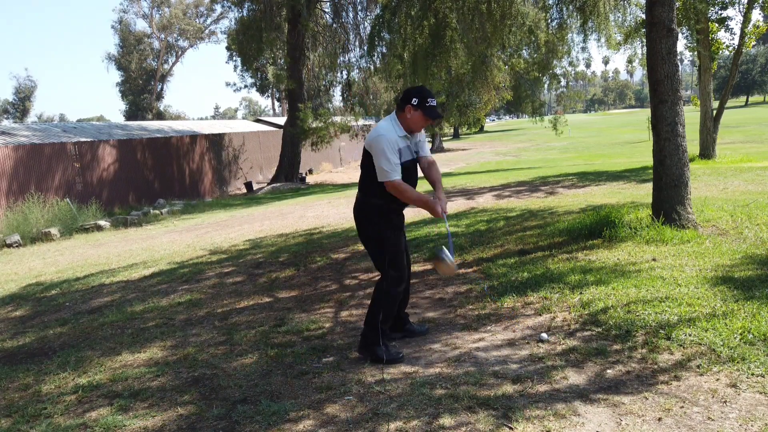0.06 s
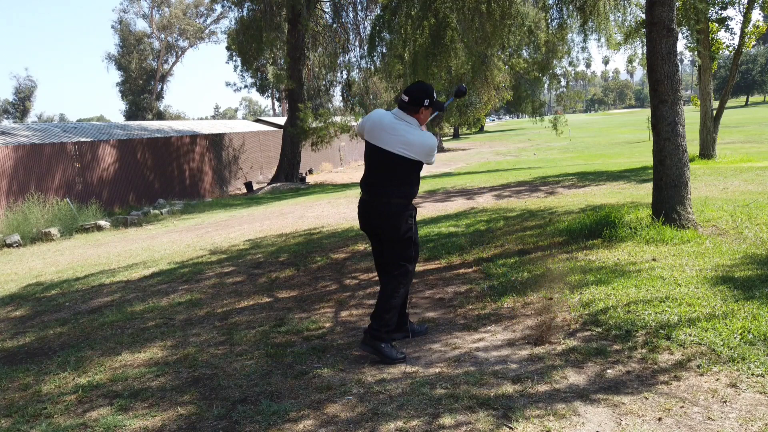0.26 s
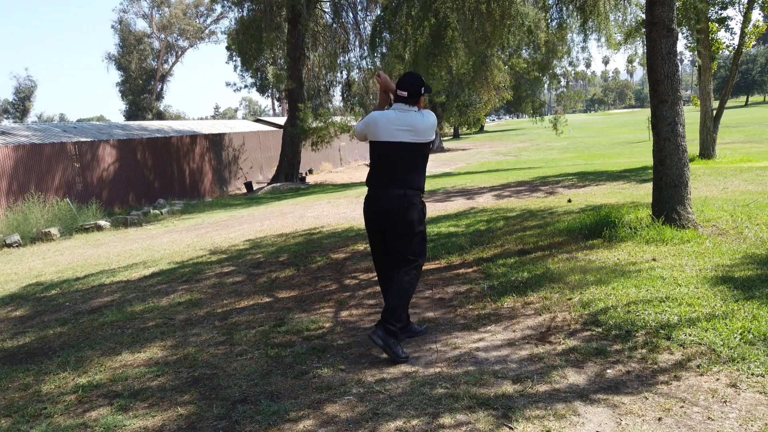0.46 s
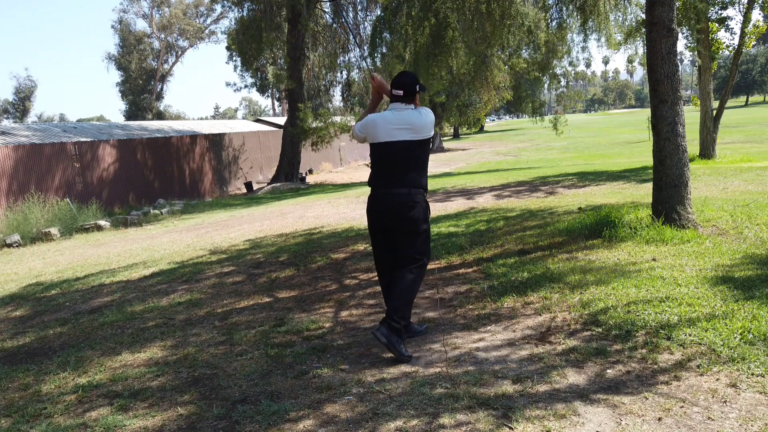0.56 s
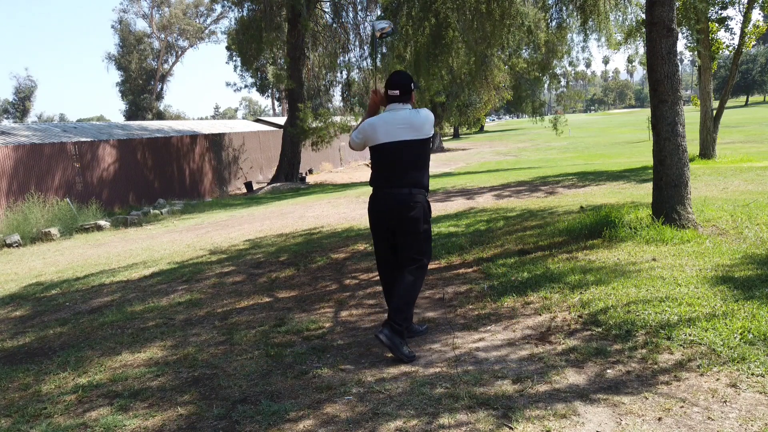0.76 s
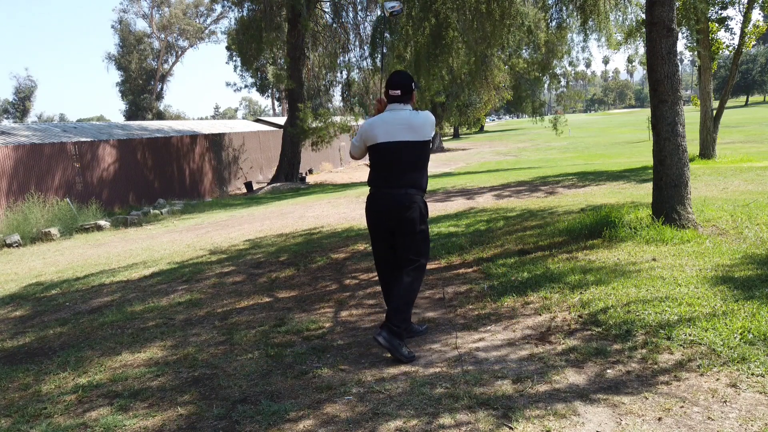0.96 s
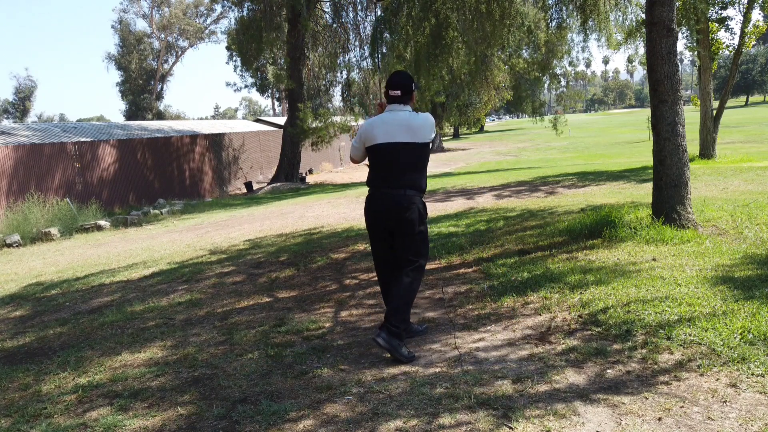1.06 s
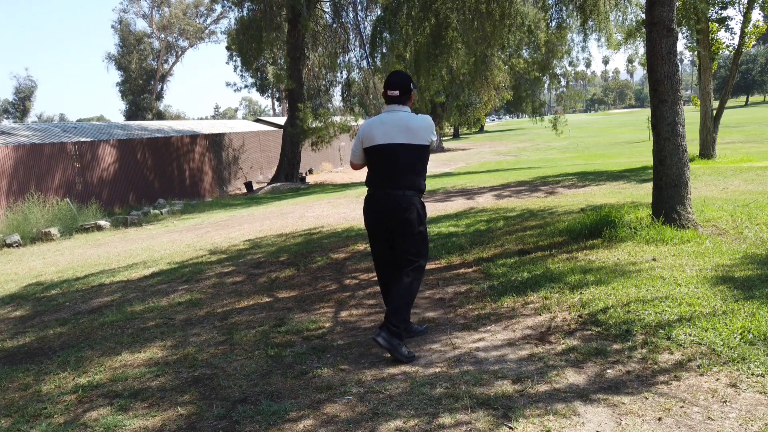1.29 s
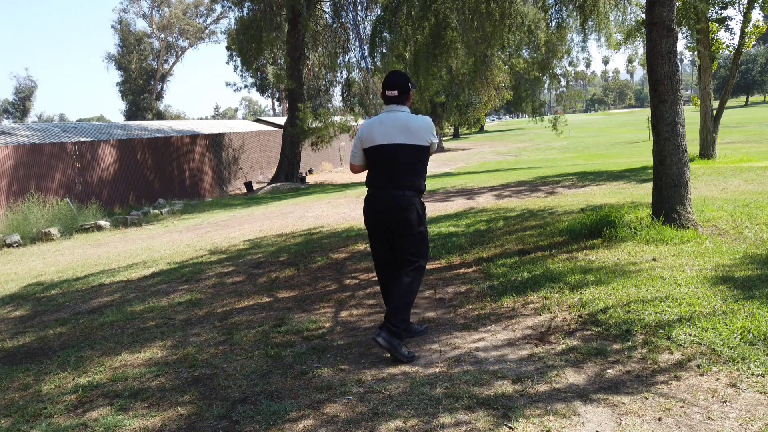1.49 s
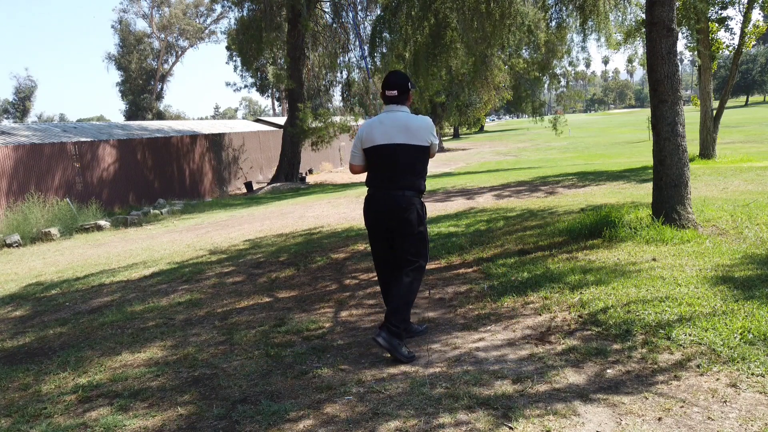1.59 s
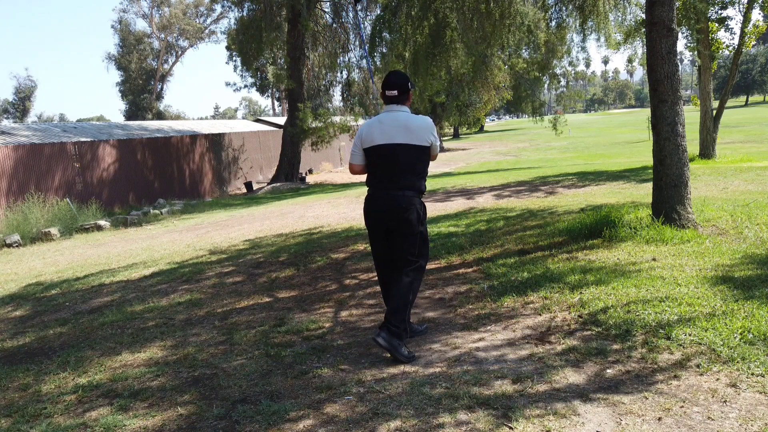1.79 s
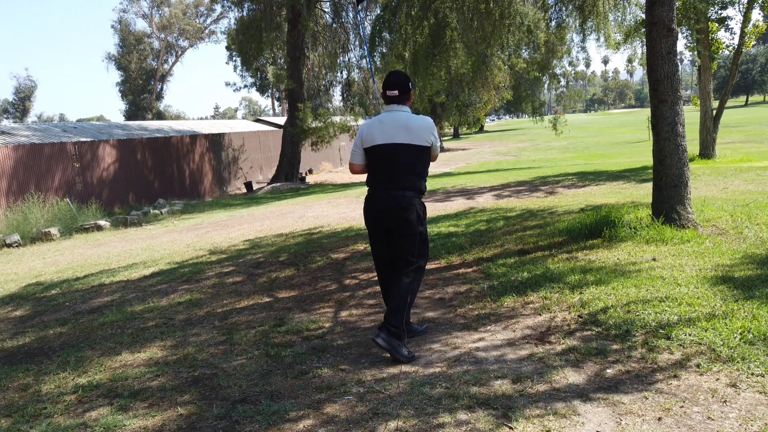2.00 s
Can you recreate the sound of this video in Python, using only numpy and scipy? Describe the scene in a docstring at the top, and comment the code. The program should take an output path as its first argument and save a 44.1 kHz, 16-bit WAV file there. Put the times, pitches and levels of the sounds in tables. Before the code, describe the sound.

A metal golf club swishes down, scuffs dry turf and hits the ball with a loud, bright crack and brief hollow ring; dirt sprays, trees return a fading echo, and wind rumbles on the close microphone.

```python
"""Golf drive under trees

Out in the open, close to the ball: a metal wood swishes down, scuffs dry turf and cracks off the ball.
Decaying sines make the crack and the ring of the hollow head, whose pitch sinks as it swings away.
Coloured clicks make the dirt that sprays and patters down; blurred noise bands return from the trees.
Wind rumbles on the microphone over a distant wash; small taps and faint far whistles come and go."""
import sys
import numpy as np
from scipy import signal
from scipy.fft import rfft, irfft
from scipy.io import wavfile
from scipy.ndimage import uniform_filter1d

SR = 44100
rng = np.random.default_rng(int(sys.argv[2]) if len(sys.argv) > 2 else 0)


def output_pcm(signal):
    """Save a mono or channel-first signal as 16-bit PCM at the path in sys.argv[1].

    Samples are clipped to [-1, 1] before scaling.
    """
    pcm = np.clip(np.atleast_2d(signal).T, -1, 1) * 32767
    wavfile.write(sys.argv[1], SR, np.round(pcm).astype(np.int16))


N = 90404
T = np.arange(N) / SR  # seconds
HIT_S = .33625  # club meets ball

# Wind gusts on the microphone. Each row: time in seconds, level in dB.
GUSTS = [(0, -31.5), (.12, -33.5), (.21, -21), (.26, -4), (.34, -22.5), (.42, -9.5), (.49, -26),
         (.56, -16.5), (.68, -32), (.82, -46), (1.15, -44), (1.45, -43), (1.55, -31), (1.68, -33),
         (1.79, -32), (1.88, -42), (2.05, -37)]
# Spectrum of the wind buffeting. Each row: frequency in Hz, relative level in dB.
BUFFET_COLOUR = [(5, -11.5), (11, -1.5), (19, -0.5), (25, -2.5), (32, -20.5), (45, -34.5), (70, -53.5),
                 (200, -105)]
# Spectrum of the flutter above the buffeting. Each row: frequency in Hz, relative level in dB.
FLUTTER_SPECTRUM = [(20, 0), (40, -0.5), (62, 0), (85, -8), (120, -13.5), (170, -21.5), (400, -32.5),
                    (2000, -71.5)]
FLUTTER_DB, FLUTTER_SHARE = -32, 0.39  # share: dB of flutter per dB of gust
# Distant wash. Each row: time in seconds, level in dB.
WASH_LEVEL = [(0, -41), (.26, -36), (.45, -48), (.58, -55), (.8, -52), (1.3, -52), (1.6, -48.5),
              (1.8, -48.5), (2.05, -49)]
# Spectrum of the wash. Each row: frequency in Hz, relative level in dB.
WASH_SPECTRUM = [(20, 3.5), (45, 13), (65, 18), (85, 10), (120, 11), (170, -0.5), (330, -7.5), (600, -5),
                 (830, -1.5), (1300, -9.5), (2000, -19), (3500, -31), (8000, -37.5), (15000, -38)]
# Spectrum of the steady rustle of leaves. Each row: frequency in Hz, relative level in dB.
RUSTLE_COLOUR = [(300, -5.5), (1000, 0), (2000, -3), (2700, -3.5), (3400, -15), (6000, -19.5), (15000, -21)]
RUSTLE_DB = -71

# Swish of the shaft. Each row: time in seconds, level in dB.
SHAFT_LEVEL = [(0, -59.5), (.055, -62), (.10, -54), (.13, -52.5), (.165, -44.5), (.215, -51), (.258, -39),
               (.305, -35), (.33, -56.5), (.36, -87)]
# Spectrum of the swish. Each row: frequency in Hz, relative level in dB.
SHAFT_SPECTRUM = [(200, -24.5), (1200, -3), (2800, 3.5), (5000, 1), (9000, 0), (15000, -5)]
# Spectrum of the low whoosh of the head. Each row: frequency in Hz, relative level in dB.
WHOOSH_SPECTRUM = [(150, -15), (330, -5), (450, -5), (590, 2), (720, -3), (880, -6.5), (1200, -18.5),
                   (3000, -37)]
WHOOSH_S, WHOOSH_WIDTH_S, WHOOSH_DB = 0.3073, 0.018, -30.5

# Small taps, low thumps and ticks; the pair near 1.09 s may be a distant echo of the crack
# or the ball striking something.
# Each row: start in seconds, peak in dB, centre in Hz, width in octaves, t60 in seconds.
SMALL_TAPS = [(0.151, -48, 398, 1.8, 0.052), (0.255, -26, 2770, 1.2, 0.029),
              (0.613, -43.5, 306, 1.4, 0.031), (0.8128, -42, 407, 1.2, 0.018), (0.807, -58, 7560, .8, 0.15),
              (1.0918, -48.5, 5180, .18, 0.013), (1.0926, -49, 7000, .9, .01),
              (1.597, -57, 3400, 0.3, 0.032), (1.606, -58, 4070, 0.39, 0.034),
              (1.662, -63.5, 3310, .18, 0.023)]

# Spectrum of the sole scuffing the turf. Each row: frequency in Hz, relative level in dB.
SCUFF_SPECTRUM = [(200, -9), (900, 3), (1500, 4.5), (2100, -5), (3000, 2), (5500, -3.5), (8000, -14),
                  (15000, -17)]
SCUFF_LEAD_S, SCUFF_WIDTH_S, SCUFF_DB = .0015, 0.00081, -2  # lead: ahead of the ball

# Modes of the hollow head, each of which may beam at the microphone as the head turns.
# Each row: frequency in Hz, relative level in dB, t60 in seconds, beam moment in seconds, beam gain in dB.
HEAD_MODES = [(3615, -4, 0.025, .35, 1), (3900, -7, 0.09, .386, 13.5), (4157, 1, 0.024, 0.34, 5),
              (4330, -17.5, 0.076, 0.46, 3), (4620, -18, 0.055, 0.39, 4.5), (5120, -10.5, .03, .35, -0.5),
              (5730, -1.5, 0.016, .35, 1), (5890, 1, 0.062, .374, 5.5), (6510, -12.5, 0.085, .353, 4),
              (6700, -4, .042, .385, 7.5), (7860, -5, 0.038, .361, 9), (8560, -2, 0.055, 0.41, 3),
              (9260, -1, 0.035, .37, 3), (10430, -13.5, 0.062, .36, 2), (11160, -18.5, 0.054, .363, 9.5),
              (13500, -7, .012, .35, 0.5)]
# Doppler shift as the head swings away. Each row: time in seconds, shift in percent.
DOPPLER = [(.336, .2), (.348, -.4), (.361, -1.1), (.376, -3.6), (.40, -3.9)]
# Reflections of the ring off the ground and two trunks.
# Each row: delay in seconds, level in dB, share of the Doppler shift, tilt in dB per octave.
REFLECTIONS = [(.016, -15, -.2, 3), (0.035, -32.5, -1.14, 6.5), (.08, -21.5, -0.12, -12)]
RING_DB, RING_LEAD_S, RING_RISE_S, BEAM_WIDTH_S = -3.5, .0008, .001, .0085
# random pitch drift in percent (rms), separate for each mode and path, and its memory
DRIFT_PERCENT, DRIFT_S = 0.16, 0.0076
SCATTER, SCATTER_S = .35, .0012  # level flutter as a share (rms), and its memory
SMEAR = .1  # the longer the path, the softer its onset (s of rise per s of delay)

# Ball and face during the blow. Each row: frequency in Hz, level in dB, t60 in seconds.
BALL_MODES = [(335, -15.5, 0.016), (1040, -10, 0.0035), (1450, 6.5, .0095), (1690, 0, 0.0085),
              (2486, -2.5, 0.0074), (2950, 1, 0.0044), (4000, 3, .004)]
# Spectrum of the noisy snap. Each row: frequency in Hz, relative level in dB.
SNAP_SPECTRUM = [(300, -13), (2200, -16), (3400, -14.5), (6000, -3.5), (9000, -2), (12000, -6.5),
                 (15000, -5)]
SNAP_DB, SNAP_T60_S = -3, 0.019

# Spectrum of the sole's thump into the ground. Each row: frequency in Hz, relative level in dB.
THUD_SPECTRUM = [(40, -7.5), (85, 3), (130, -7), (250, -19.5), (600, -30.5), (2000, -61)]
THUD_DB, THUD_T60_S = -22.5, .17
# Spectrum of the dirt spraying from the turf. Each row: frequency in Hz, relative level in dB.
SPRAY_SPECTRUM = [(90, 8.5), (200, -2.5), (500, -2.5), (900, 4.5), (1500, 3.5), (2300, -3), (3100, -12.5),
                  (7000, -7), (15000, -9.5)]
SPRAY_DB, SPRAY_RISE_S, SPRAY_T60_S, SPRAY_PER_S = -29, 0.027, 0.15, 5000
# Spectrum of grit thrown through the grass behind the club. Each row: frequency in Hz, relative level in dB.
GRIT_SPECTRUM = [(500, -8), (3000, -4.5), (6500, 1), (10000, 2.5), (15000, -3)]
GRIT_S, GRIT_WIDTH_S, GRIT_DB, GRIT_PER_S = .412, 0.021, -47.5, 3700
# Spectrum of the settling patter. Each row: frequency in Hz, relative level in dB.
PATTER_SPECTRUM = [(500, -21.5), (3000, -8.5), (7000, 6.5), (10000, 1), (15000, -2.5)]
PATTER_DB, PATTER_T60_S, PATTER_PER_S = -66.5, 4.9, 7300

# Broad bands of the returning ring: every direction has its own Doppler shift.
# Each row: frequency in Hz, relative level in dB.
HALO_SPECTRUM = [(1800, -29), (2280, -4.5), (2600, -16.5), (3500, -17.5), (3850, -0.5), (4060, 3),
                 (4400, -5.5), (4900, -17), (5500, -15), (5950, 0), (6700, 0.5), (7400, -10), (8700, -3.5),
                 (10000, -14), (15000, -22)]
# Filtering on the far paths. Each row: frequency in Hz, gain in dB.
FAR_FILTER = [(2300, -1), (2800, 5), (3900, 3.5), (6000, -2.5), (7300, -2.5), (9000, -8), (15000, -11.5)]
HALO_RISE_S, HALO_NEAR_DB, HALO_NEAR_T60_S, HALO_FAR_DB, HALO_FAR_T60_S = 0.071, -19, .17, -39.5, 0.66
HALO_FLICKER_DB, HALO_FLICKER_S = 2.2, .008  # rms drift of the far level, and its memory
# Spectrum of the crack coming back from the trees. Each row: frequency in Hz, relative level in dB.
TAIL_COLOUR = [(150, 4.5), (500, -9), (1400, -2.5), (2200, -4), (3200, -14.5), (7000, -18.5), (14000, -28)]
TAIL_DB, TAIL_RISE_S, TAIL_T60_S = -40, 0.068, 0.77
# Spectrum of a faint late return from the far trees. Each row: frequency in Hz, relative level in dB.
LATE_COLOUR = [(900, -19), (1700, 1), (2300, -2), (2750, -2), (3300, -16), (4700, -25), (7400, -25),
               (15000, -23)]
LATE_S, LATE_WIDTH_S, LATE_DB = 0.96, 0.16, -72

# Faint thin whistles, perhaps far birds.
# Each row: centre in seconds, half length in seconds, frequency in Hz, level in dB.
FAR_WHISTLES = [(1.128, .016, 5430, -79), (1.19, .045, 7400, -81), (1.35, .04, 5680, -80)]
WHISTLE_BLUR_S = .001

# Microphone response. Each row: frequency in Hz, gain in dB.
MIC_RESPONSE = [(100, -1), (2000, 0), (3000, -2), (9000, -1.5), (15000, -1.5)]
OVERLOAD_UP, OVERLOAD_DOWN = 1.35, 4.0  # clipping amplitudes, positive and negative
CEILING_DB, LOOKAHEAD_S, HOLD_S, RELEASE_S = 0.4, 0.0062, 0.011, 0.016
EDGE_HZ = 15550


def amp(db):
    """Decibels to gain."""
    return 10 ** (np.asarray(db) / 20)


def unit(x):
    """Scales to rms 1."""
    return x / np.sqrt(np.mean(x ** 2) + 1e-20)


def curve(points):
    """A control curve at every sample."""
    return np.interp(T, *np.transpose(points))


def read(points, hz):
    """A spectrum at the given frequencies, joined along log frequency."""
    f, value = np.transpose(points)
    return np.interp(np.log(hz + 1), np.log(f), value)


def colour(x, points):
    """Filters by a spectrum, padded to twice the length."""
    gain = amp(read(points, np.fft.rfftfreq(2 * N, 1 / SR)))
    return irfft(rfft(x, 2 * N) * gain)[:N]


def noise(points):
    """Coloured noise of rms 1."""
    return unit(colour(rng.standard_normal(N), points))


def grains(per_s, points):
    """Random coloured clicks of uneven size, rms 1."""
    clicks = rng.standard_normal(N) * (rng.random(N) < per_s / SR)
    return unit(colour(clicks, points))


def dying(start, rise, t60):
    """Straight rise times an exponential fall."""
    age = np.maximum(T - start, 0)
    return np.minimum(age / rise, 1) * np.exp(-np.log(1000) * age / t60)


def swell(centre, width):
    """A bell-shaped rise and fall."""
    return np.exp(-.5 * ((T - centre) / width) ** 2)


def wander(seconds):
    """Random drift of rms 1 with the given memory."""
    return unit(signal.lfilter([1], [1, -np.exp(-1 / (seconds * SR))], rng.standard_normal(N)))


def wind():
    """Gusts buffet the microphone; the flutter above grows only by a share of each gust."""
    gust_db = curve(GUSTS)
    buffet = noise(BUFFET_COLOUR)
    # level out the noise's own swells so the gust curve sets the loudness
    power = abs(signal.hilbert(buffet)) ** 2 / 2
    buffet = buffet / np.sqrt(uniform_filter1d(power, size=5000) + 1e-6)
    flutter = amp(FLUTTER_DB + FLUTTER_SHARE * gust_db) * noise(FLUTTER_SPECTRUM)
    return amp(gust_db) * buffet + flutter


def surroundings():
    """A distant wash follows its level curve; leaves rustle steadily."""
    wash = amp(curve(WASH_LEVEL)) * noise(WASH_SPECTRUM)
    return wash + amp(RUSTLE_DB) * noise(RUSTLE_COLOUR)


def swing():
    """The shaft hisses through the air; the head adds a low whoosh just before the ball."""
    swish = amp(curve(SHAFT_LEVEL)) * noise(SHAFT_SPECTRUM)
    whoosh = amp(WHOOSH_DB) * swell(WHOOSH_S, WHOOSH_WIDTH_S) * noise(WHOOSH_SPECTRUM)
    return swish + whoosh


def tap(start, db, hz, octaves, t60):
    """A short noise burst in one resonance, scaled to its peak."""
    away = np.log2((np.fft.rfftfreq(N, 1 / SR) + 1) / hz) / octaves
    burst = dying(start, 0.00012, t60) * rng.standard_normal(N)
    burst = irfft(rfft(burst) / (1 + away ** 2) ** 2, N)
    return amp(db) * burst / (abs(burst).max() + 1e-12)


def scuff():
    """The sole scuffs the turf just before the ball: a brief burst of noise."""
    level = amp(SCUFF_DB) * np.exp(-abs(T - HIT_S + SCUFF_LEAD_S) / SCUFF_WIDTH_S)
    return level * noise(SCUFF_SPECTRUM)


def mode(hz, t60, delay, doppler):
    """One mode of the receding head along one path, its pitch drifting at random."""
    percent = doppler * curve(DOPPLER) + DRIFT_PERCENT * wander(DRIFT_S)
    clock = np.cumsum(1 + percent / 100) / SR  # time stretched by the pitch shift
    level = dying(HIT_S - RING_LEAD_S + delay, RING_RISE_S + SMEAR * delay, t60)
    return level * np.sin(2 * np.pi * hz * clock)


def ring():
    """Head modes beam straight at the microphone and reflect off ground and trunks; their level flutters."""
    out = np.zeros(N)
    for hz, db, t60, beam_s, beam_db in HEAD_MODES:
        beam = amp(beam_db * swell(beam_s, BEAM_WIDTH_S))
        heard = beam * mode(hz, t60, 0, 1)
        octaves = np.log2(hz / HEAD_MODES[0][0])  # above the first mode
        for delay, path_db, doppler, tilt_db in REFLECTIONS:
            heard = heard + amp(path_db + tilt_db * octaves) * mode(hz, t60, delay, doppler)
        out += amp(db) * heard * (1 + SCATTER * wander(SCATTER_S))
    return amp(RING_DB) * out


def crack():
    """Ball and face give short decaying tones and a noisy snap."""
    tones = np.zeros(N)
    for hz, db, t60 in BALL_MODES:
        tones -= amp(db) * dying(HIT_S, .0001, t60) * np.sin(2 * np.pi * hz * (T - HIT_S))
    snap = amp(SNAP_DB) * dying(HIT_S, 0.00012, SNAP_T60_S) * noise(SNAP_SPECTRUM)
    return tones + snap


def dirt():
    """A thud in the turf, a dense spray of soil, a puff of grit, then a thin patter as it settles."""
    thud = amp(THUD_DB) * dying(HIT_S, 0.0024, THUD_T60_S) * noise(THUD_SPECTRUM)
    spray_level = amp(SPRAY_DB) * dying(HIT_S, SPRAY_RISE_S, SPRAY_T60_S)
    spray = spray_level * grains(SPRAY_PER_S, SPRAY_SPECTRUM)
    grit = amp(GRIT_DB) * swell(GRIT_S, GRIT_WIDTH_S) * grains(GRIT_PER_S, GRIT_SPECTRUM)
    patter_level = amp(PATTER_DB) * dying(HIT_S, .1, PATTER_T60_S)
    return thud + spray + grit + patter_level * grains(PATTER_PER_S, PATTER_SPECTRUM)


def trees():
    """Ground and trees return the ring as noise bands, the far ones uneven; the crack as a tail and late echo."""
    near = amp(HALO_NEAR_DB) * dying(HIT_S, HALO_RISE_S, HALO_NEAR_T60_S)
    far_db = HALO_FAR_DB + HALO_FLICKER_DB * wander(HALO_FLICKER_S)
    far = amp(far_db) * dying(HIT_S, HALO_RISE_S, HALO_FAR_T60_S)
    halo = near * noise(HALO_SPECTRUM) + colour(far * noise(HALO_SPECTRUM), FAR_FILTER)
    tail = amp(TAIL_DB) * dying(HIT_S, TAIL_RISE_S, TAIL_T60_S) * noise(TAIL_COLOUR)
    late = amp(LATE_DB) * swell(LATE_S, LATE_WIDTH_S) * noise(LATE_COLOUR)
    return halo + tail + late


def whistle(centre, half, hz, db):
    """A soft, narrow tone, blurred by distance: random drift carried on sine and cosine."""
    turn = 2 * np.pi * hz * T
    blurred = np.zeros(N)
    for wave in (np.sin, np.cos):
        blurred += uniform_filter1d(wander(WHISTLE_BLUR_S), size=100) * wave(turn)
    return amp(db) * swell(centre, half) * unit(blurred)


def scene():
    """Swing, strike and echo in the open air."""
    strike = scuff() + ring() + crack()
    small = sum(tap(*row) for row in SMALL_TAPS) + sum(whistle(*row) for row in FAR_WHISTLES)
    return (wind() + surroundings() + swing() + strike + dirt() + trees() + small)[None]


def record(dry):
    """The microphone clips unevenly, the level ducks around the loudest peak, then the band is limited."""
    x = np.clip(dry[0], -OVERLOAD_DOWN, OVERLOAD_UP)
    peak = np.argmax(abs(x))
    over_db = max(20 * np.log10(abs(x[peak])) - CEILING_DB, 0)
    since = T - T[peak]
    slope_s = np.where(since < 0, LOOKAHEAD_S, RELEASE_S)
    duck = np.clip(1 - (abs(since) - HOLD_S) / slope_s, 0, 1)  # 1 = full reduction
    x = colour(x * amp(-over_db * duck), MIC_RESPONSE)
    lowpass = signal.firwin(255, EDGE_HZ, window=("kaiser", 9), fs=SR)
    return signal.oaconvolve(x, lowpass, "same")[None]


dry = scene()
out = record(dry)
output_pcm(out)
```